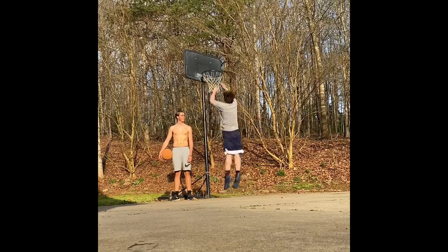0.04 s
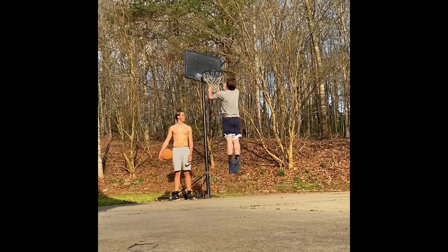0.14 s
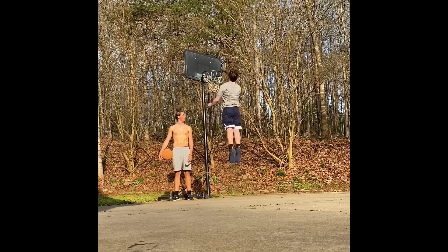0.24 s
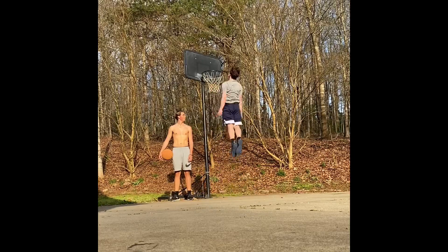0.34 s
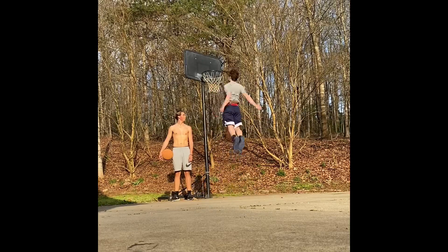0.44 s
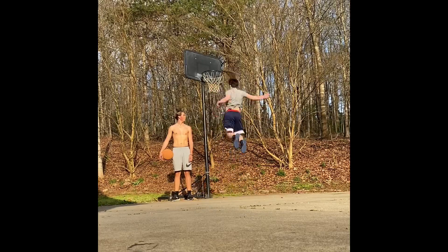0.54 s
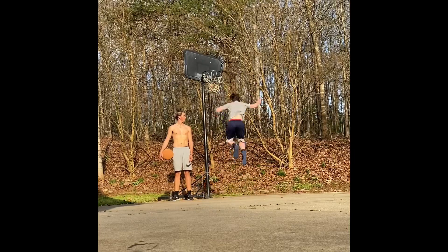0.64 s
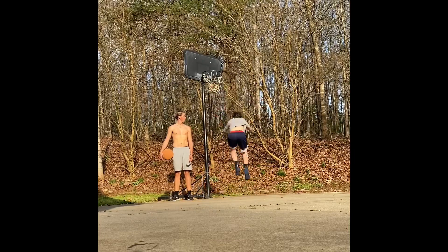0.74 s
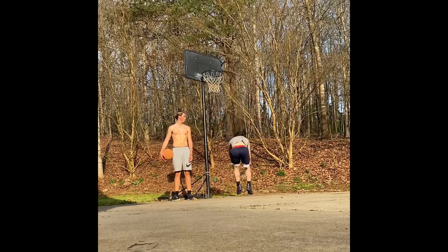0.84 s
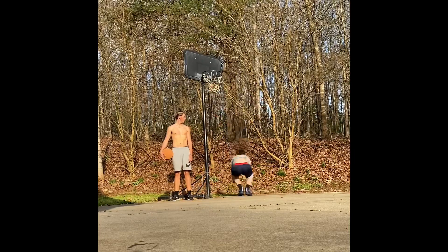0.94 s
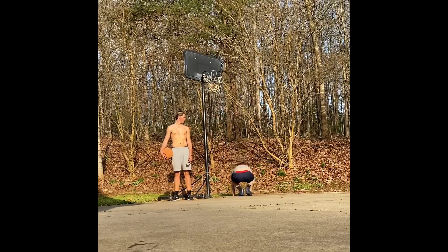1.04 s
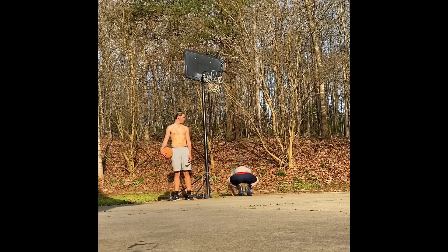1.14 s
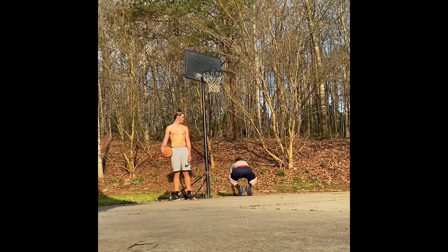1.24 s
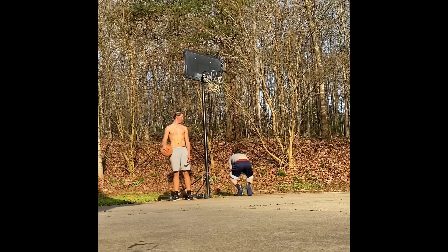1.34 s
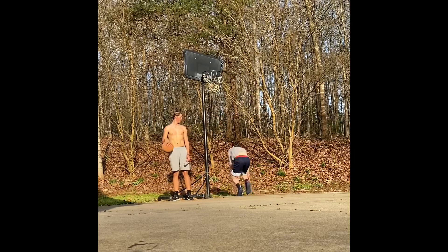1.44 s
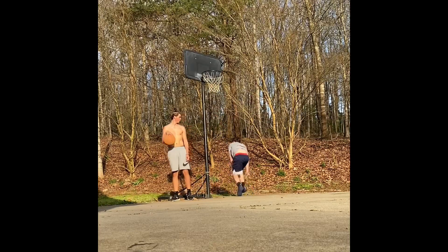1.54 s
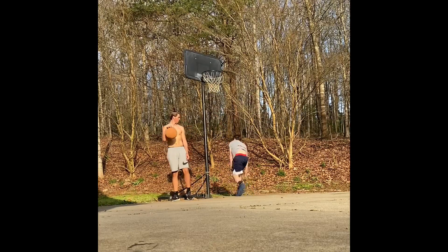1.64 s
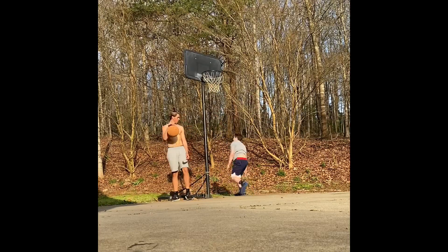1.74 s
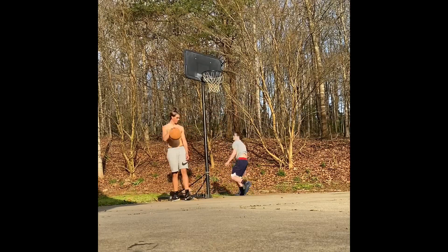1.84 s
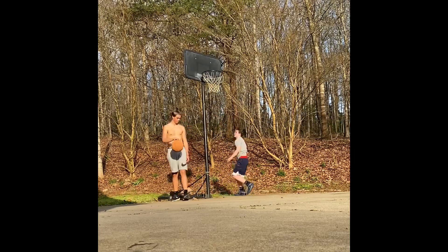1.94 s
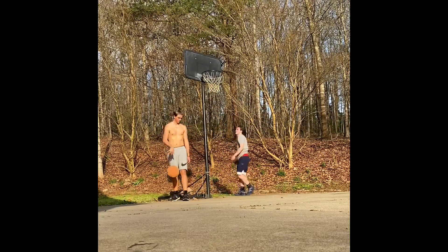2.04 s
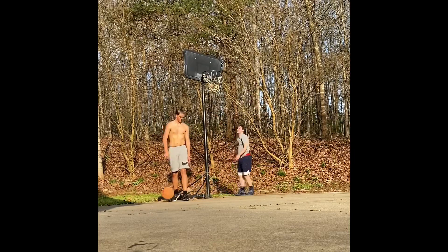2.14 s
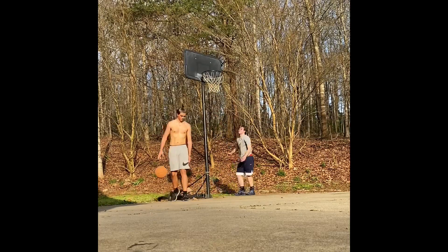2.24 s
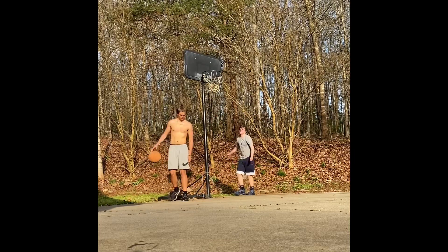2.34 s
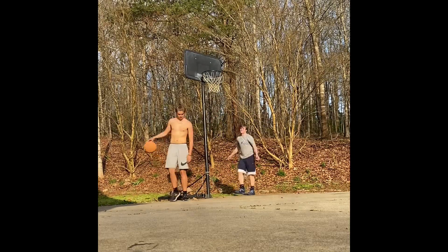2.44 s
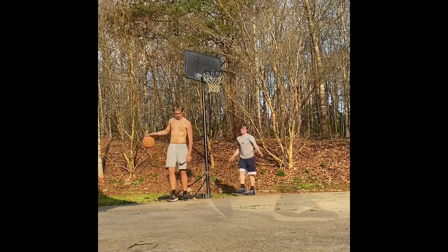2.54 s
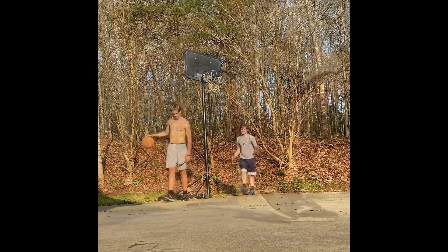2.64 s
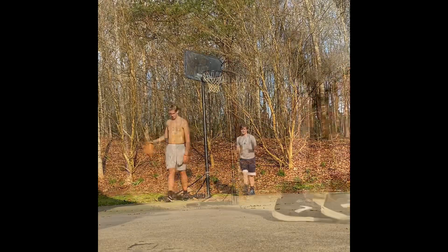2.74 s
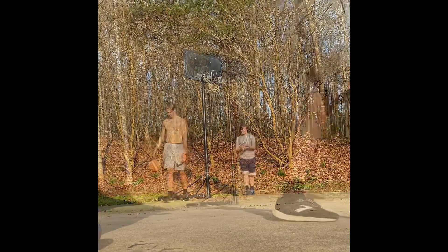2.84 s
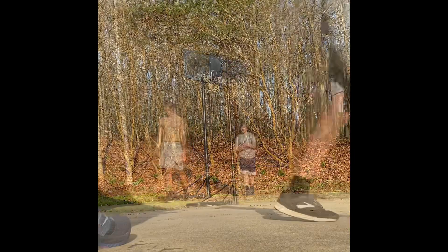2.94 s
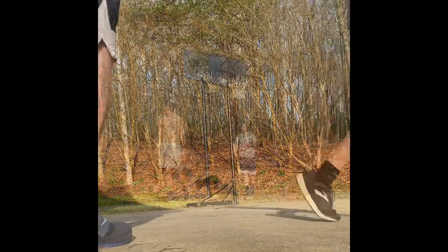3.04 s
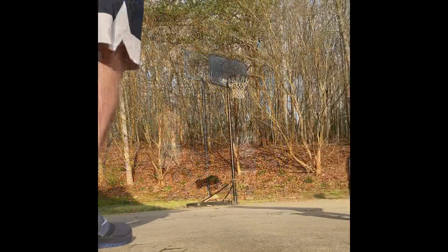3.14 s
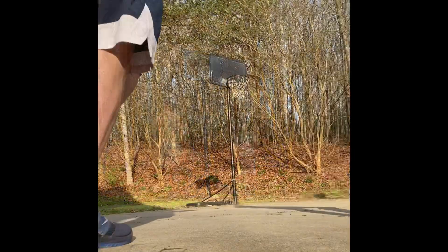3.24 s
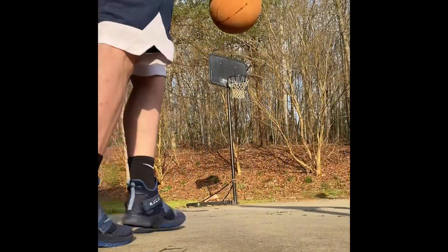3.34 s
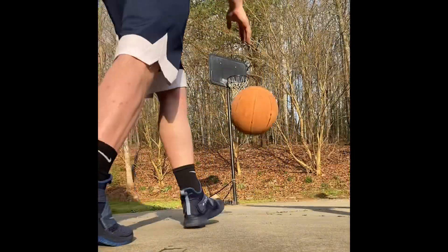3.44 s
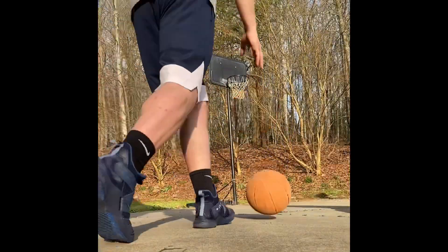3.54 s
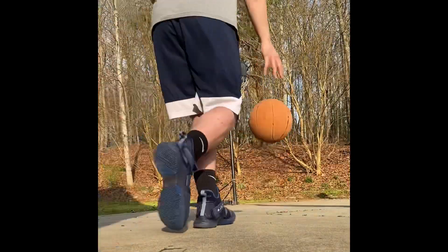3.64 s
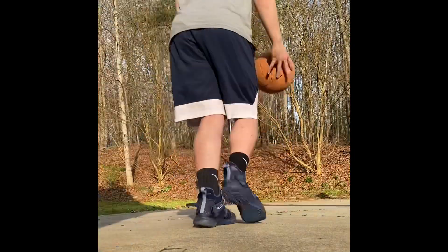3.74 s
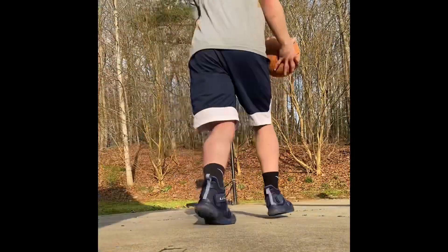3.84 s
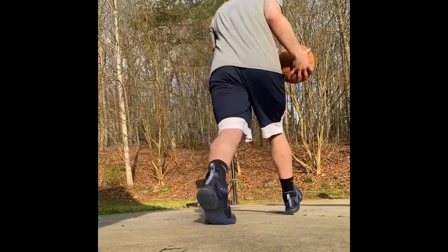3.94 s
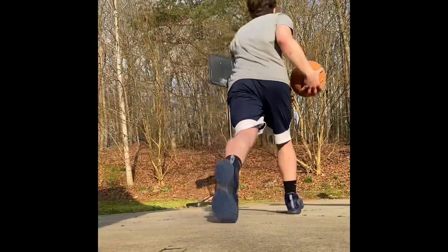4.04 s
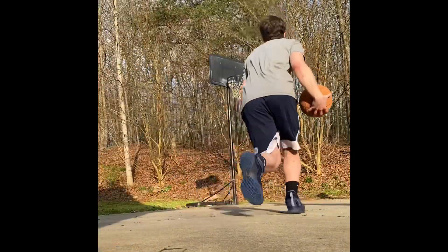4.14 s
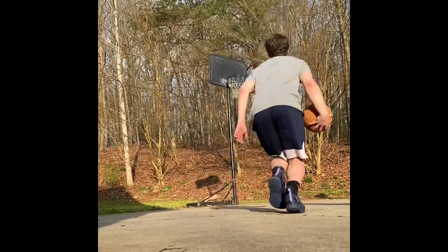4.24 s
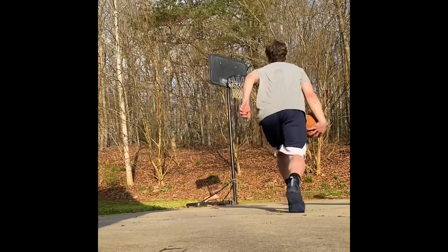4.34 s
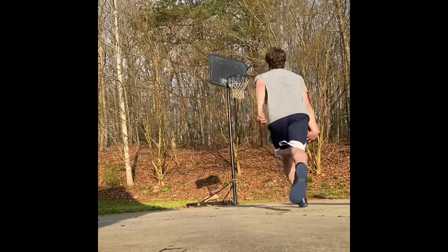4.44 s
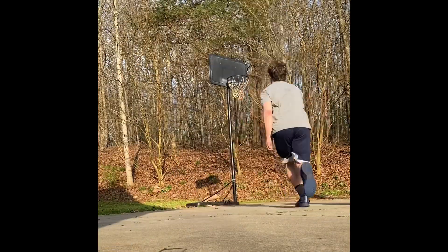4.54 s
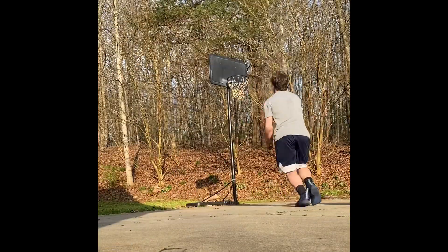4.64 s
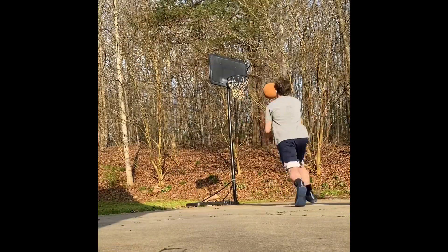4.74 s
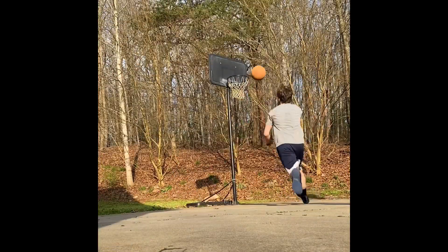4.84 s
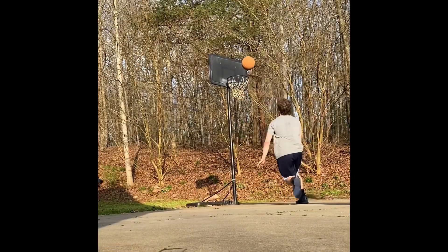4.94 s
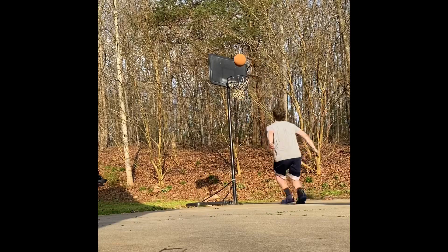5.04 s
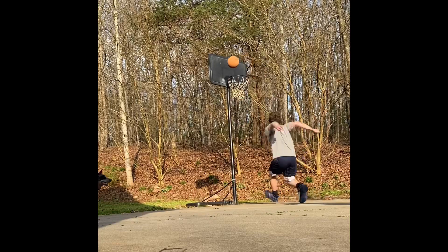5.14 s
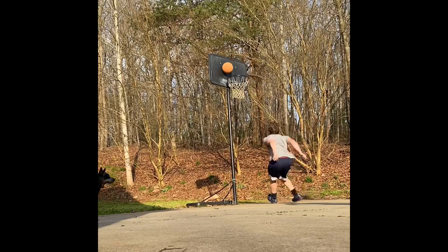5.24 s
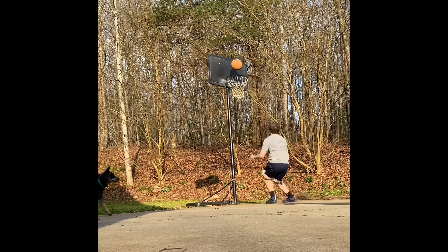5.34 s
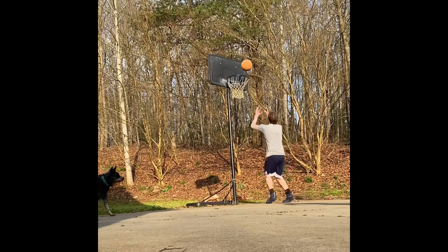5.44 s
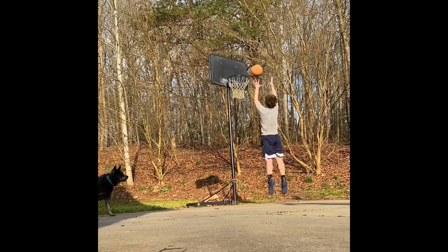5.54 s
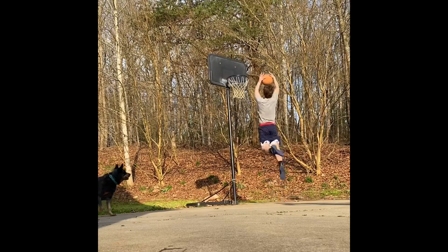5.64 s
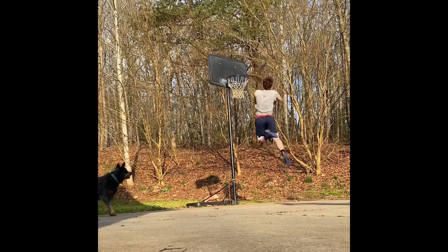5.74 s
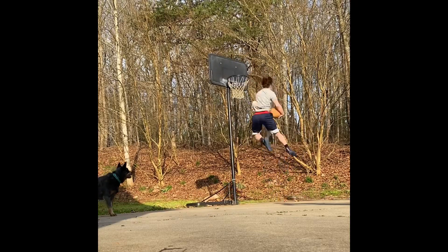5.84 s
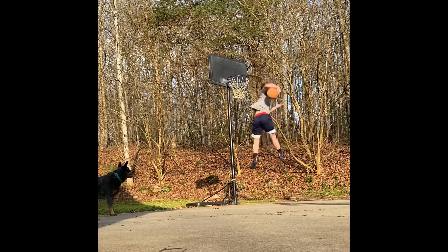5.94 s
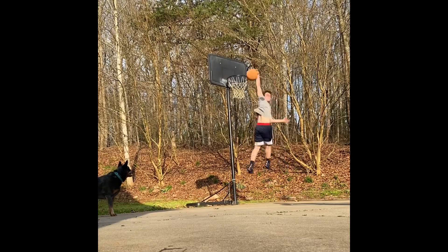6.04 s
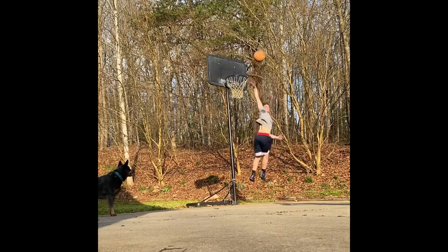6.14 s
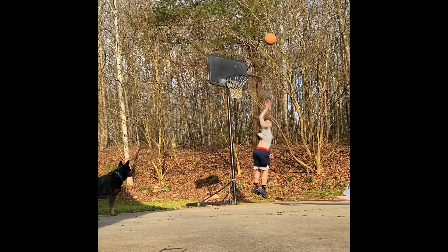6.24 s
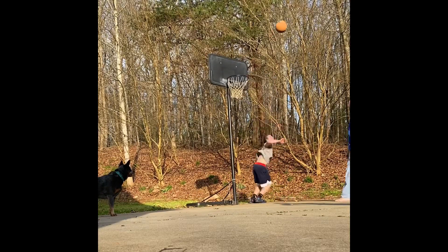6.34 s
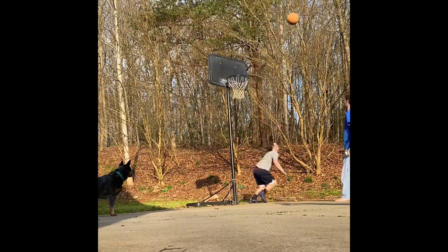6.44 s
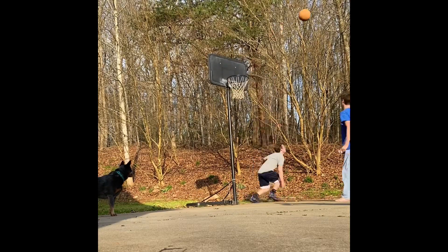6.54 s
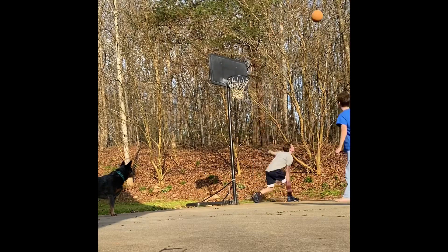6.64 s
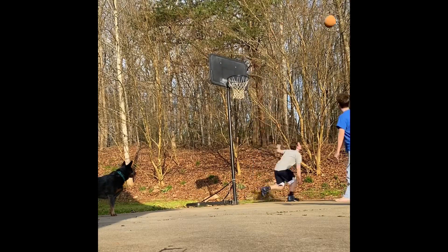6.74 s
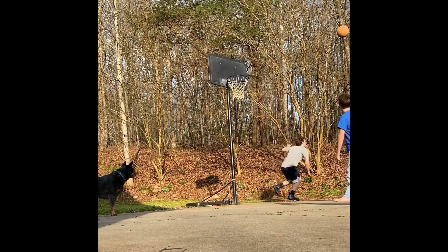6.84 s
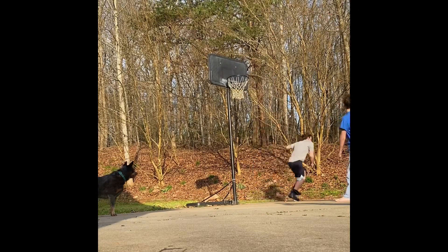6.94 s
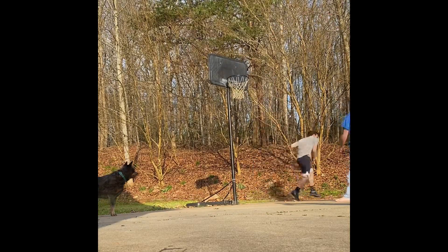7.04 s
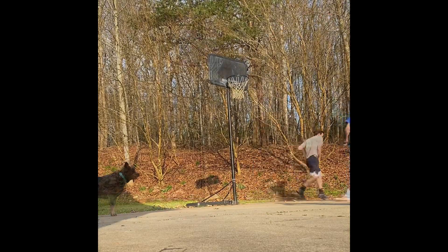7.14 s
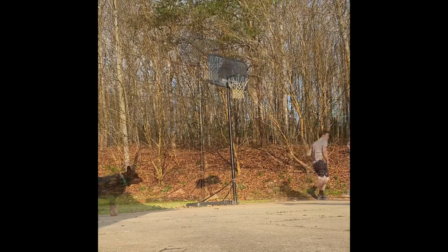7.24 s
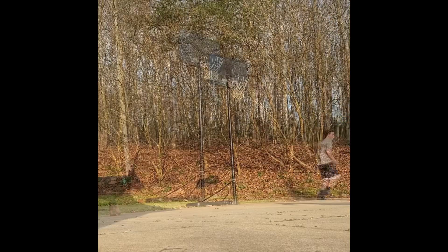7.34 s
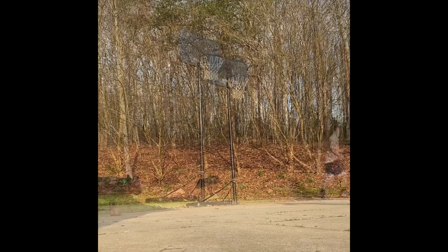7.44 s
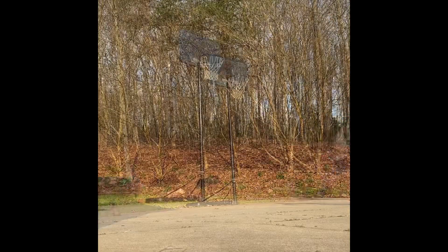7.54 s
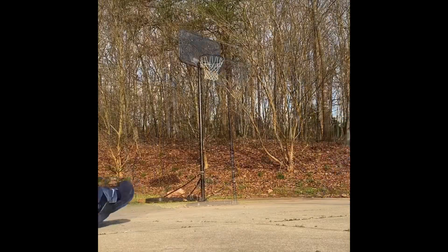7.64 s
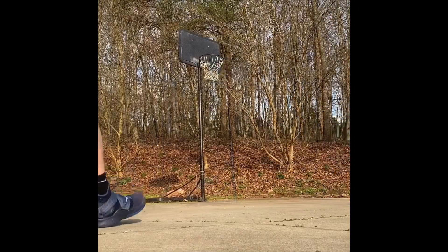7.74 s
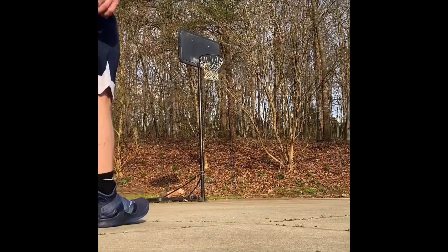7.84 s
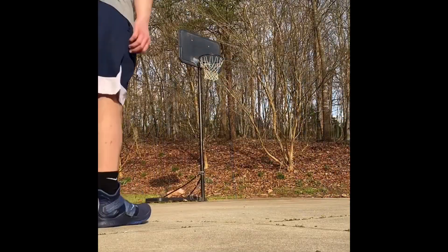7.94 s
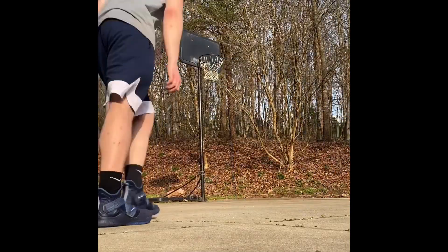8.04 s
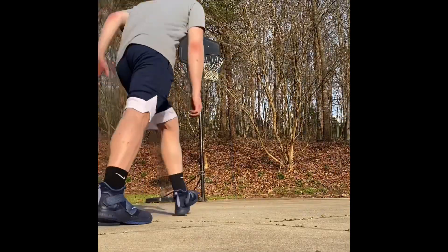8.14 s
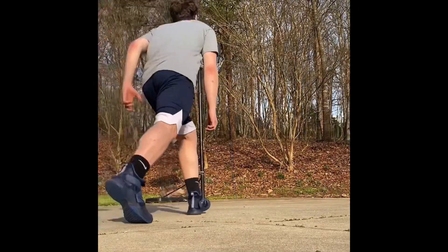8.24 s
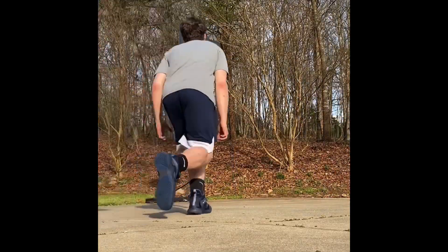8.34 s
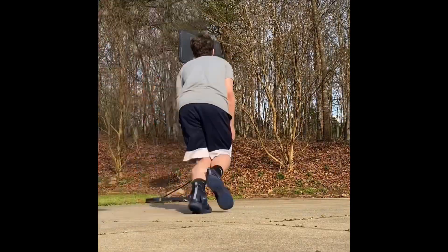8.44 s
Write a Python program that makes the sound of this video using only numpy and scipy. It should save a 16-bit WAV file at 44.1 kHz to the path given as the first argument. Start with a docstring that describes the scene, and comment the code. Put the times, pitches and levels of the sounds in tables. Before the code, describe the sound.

Scattered basketball bounces and gritty footsteps on outdoor asphalt, then a loose hoop clatters and clinks, with a far motor humming underneath.

```python
"""A ball bounces on a driveway at the edge of a wood: each impact gives a falling slap and a low
thump, and excites the modes of the ball's shell and enclosed air. Shoes land, scuff and squeak on
gritty asphalt, and a portable hoop rattles and clinks in its own modes. A far motor hums, a distant
bird whistles, traffic rumbles and leaves rustle. Trees and walls scatter echoes, and two closely
spaced microphone ports receive the sound with a phase difference."""
import sys
import numpy as np
from scipy import signal
from scipy.fft import rfft, irfft, next_fast_len
from scipy.io import wavfile

SR = 44100
rng = np.random.default_rng(int(sys.argv[2]) if len(sys.argv) > 2 else 0)


def file_out(sig):
    """Save sig as 16-bit WAV at sys.argv[1]."""
    # one column per channel
    cols = np.atleast_2d(sig).T
    # limit, then scale
    lim = np.clip(cols, -1, 1)
    pcm = np.round(lim * 32767).astype(np.int16)
    wavfile.write(sys.argv[1], SR, pcm)


N = 373959


def amp(db):
    """Amplitude ratio of a level in decibels."""
    return 10 ** (np.asarray(db) / 20)


def unit_rms(x):
    """Normalisation to unit rms."""
    return x / np.sqrt(np.mean(x ** 2) + 1e-20)


def in_time(rows):
    """Linear interpolation of each column at every sample."""
    times, *columns = np.transpose(rows)
    return [np.interp(np.arange(N) / SR, times, column) for column in columns]


def at_hz(points, hz):
    """Interpolation on a logarithmic frequency axis."""
    freqs, values = np.transpose(points)
    return np.interp(np.log(hz + 1), np.log(freqs + 1), values)


def coloured(x, points):
    """Zero-phase filtering by a gain curve."""
    size = next_fast_len(N + 4096)
    gain = amp(at_hz(points, np.fft.rfftfreq(size, 1 / SR)))
    return irfft(rfft(x, size) * gain, size)[..., :N]


def band(x, low_hz, high_hz):
    """Band-pass filter with gentle slopes."""
    sos = signal.butter(2, [low_hz, min(high_hz, .45 * SR)], "band", fs=SR, output="sos")
    return signal.sosfilt(sos, x)


def drift(knots_per_s):
    """Random modulation: straight lines between standard normal values."""
    knots = rng.standard_normal(800)
    return np.interp(np.arange(N) / SR * knots_per_s, np.arange(len(knots)), knots)


def mode(force, hz, t60):
    """Damped resonator whose impulse response is a decaying unit sine."""
    r, w = amp(-60 / (t60 * SR)), 2 * np.pi * hz / SR
    return signal.lfilter([0, np.sin(w)], [1, -2 * r * np.cos(w), r * r], force + 1e-18)


def decay(t, t60):
    """Exponential decay, 60 dB in t60."""
    return 10 ** (-3 * t / t60)


def add(out, s, x, pan_db=0):
    """Superposition at time s, with the left channel pan_db above the right."""
    i = round(s * SR)
    x = x[:N - i]
    out[:, i:i + len(x)] += x * amp([[pan_db / 2], [-pan_db / 2]])


def lingering(x, t60=0.93):
    """Reverberant energy: a leaky integral of the sound's power."""
    r = amp(-120 / (t60 * SR))
    return signal.lfilter([1 - r], [1, -r], np.mean(x ** 2, axis=0))


# background: t/s, rumble level/dB, leaf murmur level/dB, rustle level/dB
AIR_LEVELS = [(0.0, -46, -60, -58.5), (1.9, -46, -57, -88.5), (3.3, -48, -62.5, -78),
              (4.6, -46.5, -56, -69.5), (7.2, -49.5, -59.5, -81.5), (7.8, -49, -63.5, -90),
              (8.48, -48, -60, -92)]
# its spectra, in phase and in antiphase at the ports: f/Hz, level/dB
AIR_IN_PHASE = [(18, -46), (30, 3), (118, -1), (176, -5.5), (359, -14), (3570, -28.5), (5890, -33.5),
                (7280, -44), (8760, -73.5), (11400, -66.5), (14100, -47), (16500, -90)]
AIR_ANTIPHASE = [(18, -47), (30, -29.5), (112, -6.5), (261, -12.5), (772, -6.5), (1120, -10.5),
                 (1840, -19.5), (2970, -15.5), (6550, -27.5), (10500, -27.5), (14100, -38.5), (16500, -79)]
BALL_WASH_DB, HOOP_WASH_DB = (-14.5, -22.5, -46), (-14, -14.5, -38.5)   # rumble, murmur, rustle


def open_air(ball, hoop):
    """Incoherent sources add in power: traffic, leaves and the far scatter of ball and hoop."""
    white = rng.standard_normal((2, N))
    pair = np.array([coloured(white[0], AIR_IN_PHASE), amp(-10) * coloured(white[1], AIR_ANTIPHASE)])
    rumble, below_rustle = (signal.sosfiltfilt(signal.butter(1, hz, fs=SR, output="sos"), pair)
                            for hz in (330, 2700))
    layers = rumble, below_rustle - rumble, pair - below_rustle
    late_ball, late_hoop = lingering(ball), lingering(hoop)
    total = 0
    for layer, db, ball_db, hoop_db in zip(layers, in_time(AIR_LEVELS), BALL_WASH_DB, HOOP_WASH_DB):
        power = amp(db) ** 2 + amp(ball_db) ** 2 * late_ball + amp(hoop_db) ** 2 * late_hoop
        total = total + layer / np.std(layer[0]) * np.sqrt(power) * amp(1.3 * drift(12))
    mid, side = total
    return np.array([mid + side, mid - side])


# far motor: t/s, level/dB
MOTOR_LEVELS = [(0.0, -34), (0.6, -36), (1.0, -40.5), (1.7, -41.5), (2.05, -51.5), (2.35, -35.5),
                (2.85, -47), (3.45, -41.5), (3.95, -36), (4.7, -45), (5.1, -47), (6.3, -43.5), (6.8, -36.5),
                (7.25, -47), (8.48, -71)]
# its partials: harmonic number, relative level/dB
MOTOR_HARMONICS = [(1, -4), (2, -27.5)]


def motor_hum(hz=110.6, sag_hz_per_s=.28):
    """A periodic source gives harmonics; they sink slowly and waver as they carry through the air."""
    phase = 2 * np.pi * np.cumsum(hz - sag_hz_per_s * np.arange(N) / SR + 0.5 * drift(12)) / SR
    tones = sum(amp(db + 1.7 * drift(8.3)) * np.sin(k * phase) for k, db in MOTOR_HARMONICS)
    return np.sqrt(2) * amp(in_time(MOTOR_LEVELS)[0]) * tones * amp([[-.2], [.2]])


# position of the feet: t/s, left-minus-right level/dB
FOOT_PATH = [(0, -4.5), (2.9, 2), (4.2, -4.5), (5.2, 3.5), (6.5, 2), (8.48, 6)]


def foot_pan(s):
    """A level difference between the channels places the feet at time s."""
    return np.interp(s, *np.transpose(FOOT_PATH))


# single grains underfoot: t/s, level/dB, centre f/Hz
GRIT_CRACKS = [(0.075, -26, 4900), (0.1194, -47.5, 4470), (0.7803, -37.5, 5400), (1.055, -31, 5470),
               (2.7134, -45.5, 3600), (2.863, -40, 2120), (2.9362, -41, 2160), (3.478, -51, 3540),
               (3.955, -30, 2500), (4.2308, -31.5, 2480), (4.2459, -23, 3000), (4.2905, -36, 2840),
               (4.312, -27.5, 3470), (4.447, -38, 2240), (4.778, -26, 3470), (4.791, -30, 3330),
               (7.875, -50, 5470), (7.907, -52, 5200), (7.965, -46, 3340), (8.315, -46, 5600),
               (8.34, -44, 2000), (8.351, -41, 5500), (8.3887, -43.5, 3430)]


def grit_cracks(t60=0.001):
    """Brittle fracture: a grain cracks in a very short pulse, so its spectrum is broad."""
    out, t = np.zeros((2, N)), np.arange(SR // 50) / SR
    for s, db, hz in GRIT_CRACKS:
        crack = band(rng.standard_normal(len(t)) * decay(t, t60), hz / 1.4, hz * 1.4)
        add(out, s, amp(db) * crack / np.abs(crack).max(), foot_pan(s))
    return out


# light footsteps and dull knocks from the hoop's backboard: t/s, level/dB, centre f/Hz, t60/s
TAPS = [(0.16, -35.5, 444, 0.022), (0.412, -36.5, 700, 0.032), (1.053, -30, 902, 0.054),
        (1.071, -22, 1140, 0.023), (1.668, -34, 550, 0.043), (2.399, -25.5, 724, 0.024),
        (2.403, -45, 5600, 0.19), (2.953, -17.5, 650, 0.0057), (3.27, -37, 2060, 0.014),
        (3.742, -36, 695, 0.054), (3.8, -30.5, 480, 0.056), (3.823, -38, 400, 0.05),
        (4.454, -30.5, 970, 0.04), (4.629, -29, 1750, 0.033), (4.765, -24, 2870, 0.044),
        (5.027, -31.5, 516, 0.1), (5.116, -20, 2100, 0.0079), (6.104, -17.5, 430, 0.098),
        (6.294, -30, 1500, 0.015), (6.306, -28, 1700, 0.019), (6.316, -36, 350, 0.03),
        (6.363, -33, 3470, 0.03), (6.67, -28.5, 5950, 0.024), (6.817, -40, 560, 0.093),
        (7.054, -30, 2120, 0.0093), (7.164, -36.5, 644, 0.034), (7.577, -44, 471, 0.024),
        (7.908, -35, 600, 0.0082), (8.009, -45, 1890, 0.018), (8.071, -46, 3930, 0.07)]


def taps():
    """A heavily damped impact gives a decaying band of noise under a brief broadband tick."""
    out, t = np.zeros((2, N)), np.arange(SR // 8) / SR
    for s, db, hz, t60 in TAPS:
        noise = rng.standard_normal(len(t))
        puff = unit_rms(band(noise, hz / 1.63, hz * 1.38))
        tick = 2.5 * noise * decay(t, 0.0026)
        envelope = decay(t, t60) * np.minimum(t / 0.0029, 1)
        add(out, s, amp(db) * (puff + tick) * envelope, foot_pan(s))
    return out


# bounces and hard landings: t/s, level/dB, thump gain/dB, crack gain/dB, thump f/Hz,
# echo gain/dB re crack, thump delay/s, hollow gain/dB, slap sweep span/Hz
IMPACTS = [(0.883, -15, -4.5, -27, 84, 6.5, 0.0067, -0.5, 1993),
           (0.9028, -12, -2.5, -20, 85.5, 3.5, 0.0054, -12, 2240),
           (2.151, -12, 4.5, -8.5, 93, -4.5, 0.0073, -1, 2250),
           (2.997, -24.5, 3.5, -22, 102, -26, 0.0052, 0, 2585),
           (3.533, -6.5, 1.5, -10, 108, -25.5, 0.00917, 1, 3037),
           (5.269, -18.5, 5.5, 3, 87.5, -23, 0.0083, 1.5, 2560),
           (7.462, -19, 1.5, -4.5, 103.4, -21, 0.0059, 1, 2580)]
# modes of the ball's air and shell: f/Hz, level/dB, t60/s
BALL_MODES = [(231, -7.5, 0.04), (352, -12.5, 0.024), (683, -21, 0.056), (856, -12, 0.099),
              (1117, -3, 0.026), (1336, -8, 0.034), (1680, -12.5, 0.053), (2090, -16.5, 0.03)]


def bounces(spread_s=0.002164, thump_fall=0.21):
    """Elastic impact: as the contact patch spreads, a slap falls into a thump; the cavity rings on."""
    out, t = np.zeros((2, N)), np.arange(SR // 4) / SR
    echo_envelope = np.clip((t - .009) / 0.0039, 0, 1) * decay(t, 0.16)   # off nearby surfaces
    for s, db, thump_db, crack_db, thump_hz, echo_db, delay, hollow_db, span_hz in IMPACTS:
        noise = rng.standard_normal(len(t))
        sweep = 2 * np.pi * (200 * t + span_hz * spread_s * (1 - np.exp(-t / spread_s)))
        slap = np.sin(sweep) * (1 + 1.34 * band(noise, 140, 1950))
        slap *= np.exp(-(t / (3.65 * spread_s)) ** 2) * np.minimum(t / 0.00019, 1)
        early, late = np.minimum(t - delay, 0), np.maximum(t - delay, 0)   # about the widest contact
        bend = thump_fall * 0.0039 * (1 - np.exp(-late / 0.0031))   # the thump starts sharp
        phase = 2 * np.pi * thump_hz * (2 * early + late + bend)
        thump = np.sin(phase) - 0.19 * np.sin(3 * phase)
        thump *= np.exp(-(late / 0.01) ** 2 - (early / 0.0025) ** 2)
        thump += 0.2 * np.sin(2 * np.pi * 0.89 * thump_hz * late) * decay(late, 0.46)
        crack = unit_rms(band(noise, 4300, 8900)) * decay(t, 0.0062)
        crack += amp(echo_db) * echo_envelope * unit_rms(band(noise, 1400, 4500))
        force = 0.092 * noise * decay(t, 0.056)
        hollow = sum(amp(mode_db) * mode(force, hz, t60) for hz, mode_db, t60 in BALL_MODES)
        add(out, s, amp(db) * (0.9 * slap + amp(crack_db) * crack + amp(hollow_db) * hollow), -1.4)
        add(out, s, amp(db + thump_db) * thump)
    return out


# soles sliding on grit: t/s, duration/s, start level/dB, end level/dB, starting centre f/Hz
SLIDES = [(2.397, 0.038, -39.5, -48, 1030), (2.861, 0.11, -60.5, -51.5, 1420), (3, 0.068, -40, -43.5, 1175),
          (3.455, 0.065, -49.5, -43, 1390), (3.955, 0.078, -41, -39, 1830), (4.25, 0.14, -52.5, -43, 2890),
          (4.466, 0.0075, -37.5, -41, 1120), (4.548, 0.016, -46, -47.5, 2400),
          (4.689, 0.048, -55.5, -48, 2050), (4.765, 0.043, -40, -43, 2650),
          (4.881, 0.028, -42.5, -77, 2400), (5.034, 0.015, -33, -68, 1090),
          (5.184, 0.019, -35, -37.5, 2830), (5.218, 0.032, -29, -41, 5500),
          (7.133, 0.061, -57.5, -63.5, 4480), (7.911, 0.052, -57.5, -52.5, 2080),
          (8.054, 0.02, -54.5, -54, 4130), (8.085, 0.049, -49, -54, 1500),
          (8.301, 0.11, -61.5, -50.5, 1830), (8.406, 0.056, -45.5, -55.5, 1310)]


def scuffs(ramp_s=0.018, sag_oct_per_s=7):
    """Sliding friction: grains snap over a hiss whose broad spectral peak sinks as the sole slows."""
    snaps = rng.random(N) < 300 * amp(6.0 * drift(40)) / SR
    snaps = snaps * amp(4.5 * np.minimum(rng.exponential(1, N), 2.5))
    grit = rng.standard_normal(N) * (1 + 7.0 * snaps) * amp(2.6 * drift(90))
    course, gate, out = [], 0, 0
    for s, length, start_db, end_db, hz in SLIDES:
        end = s + length
        course += [(s, start_db, hz), (end, end_db, hz * 2 ** (-sag_oct_per_s * length))]
        gate = gate + np.interp(np.arange(N) / SR, [s - ramp_s, s, end, end + ramp_s], [0, 1, 1, 0])
    level_db, centre_hz = in_time(course)
    edges = np.geomspace(300, 16000, 10)
    for k, (low, high) in enumerate(zip(edges, edges[1:])):
        octaves = np.log2(np.sqrt(low * high) / centre_hz)
        hump = 0.38 + np.exp(-.5 * (octaves / 0.99) ** 2)
        sign = (-1) ** k   # neighbouring bands join without a dip
        out = out + sign * unit_rms(band(grit, low, high)) * hump * amp(2.8 * drift(60))
    return 0.3 * out * amp(level_db) * np.minimum(gate, 1) * amp([[-1.1], [1.1]])


# whistles: t/s, glide duration/s, start f/Hz, glide end f/Hz, final drop/Hz, level/dB
WHISTLES = [(2.45, 0.16, 2850, 2850, 0, -67), (7.212, 0.1, 4110, 4110, 0, -71),
            (7.57, 0.04, 3450, 3450, 0, -70), (7.645, .093, 4050, 3300, 1000, -70),
            (7.94, 0.075, 3620, 3200, 850, -70), (8.21, 0.09, 3740, 3170, 750, -71)]


def bird(swell_db=4, drop_s=.022, drop_db=5):
    """Frequency modulation of a pure tone: it holds, or glides down into a quick, louder drop."""
    out, t = np.zeros((2, N)), np.arange(SR // 4) / SR
    waver_hz, waver_db = 13.0 * drift(45), 2.3 * drift(60)
    for s, glide, start_hz, knee_hz, drop_hz, db in WHISTLES:
        drops = drop_hz > 0
        end = glide + drop_s * drops
        here = slice(round(s * SR), round(s * SR) + len(t))
        hz = np.interp(t, [0, glide, glide + drop_s], [start_hz, knee_hz, knee_hz - drop_hz])
        level_db = np.interp(t, [0, glide, glide + drop_s / 4], [db - swell_db, db, db + drop_db * drops])
        gate = np.clip(np.minimum(t, end + .008 - t) / .008, 0, 1)
        tone = np.sqrt(2) * np.sin(2 * np.pi * np.cumsum(hz + waver_hz[here]) / SR)
        add(out, s, amp(level_db + waver_db[here]) * gate * tone)
    return out


# shoe squeaks and two sharp knocks: peak t/s, level/dB, f/Hz, 1/e half-width/s, fall rate/(Hz/s)
CHIRPS = [(5.12, -38, 2140, 0.0053, 20000), (5.223, -33.5, 4420, 0.0059, 5000),
          (6.336, -31, 2120, 0.0029, 150000), (6.365, -26.5, 2010, 0.0035, 121000),
          (6.677, -23.5, 2080, 0.0041, 70000), (8.144, -66.5, 4200, 0.012, 1000)]


def falling_chirps(roughness=0.43):
    """Linear chirp in a Gaussian envelope: a short rough tone swells, falls in pitch and is gone."""
    out, t = np.zeros((2, N)), np.arange(SR // 16) / SR - .03
    for s, db, hz, half_width, fall in CHIRPS:
        flutter = unit_rms(band(rng.standard_normal(len(t)), 60, 830))
        tone = np.sin(2 * np.pi * (hz * t - fall * t ** 2 / 2)) * (1 + roughness * flutter)
        add(out, s + t[0], amp(db) * tone * np.exp(-(t / half_width) ** 2), foot_pan(s))
    return out


# jolts through the hoop: t/s, level/dB, metal gain/dB, shaking t60/s
HOOP_JOLTS = [(5.284, -21, -9.5, 0.36), (5.471, -21.5, -12, 0.14), (5.489, -25, -22, 0.19),
              (5.652, -32.5, -16.5, 0.15), (5.679, -25, -14.5, 0.11), (5.82, -30, -2.5, 0.084),
              (5.845, -36, -9.5, 0.21), (6.05, -40.5, -5.5, 0.34), (6.074, -26, -14.5, 0.23),
              (6.089, -23.5, -14.5, 0.34), (6.1, -17.5, -9, 0.19), (6.123, -15.5, -32, 0.065),
              (6.218, -32, -34, 0.38), (6.275, -26.5, -26, 0.069), (6.296, -22.5, -38, 0.086),
              (6.316, -20.5, -33, 0.049), (6.335, -24, -18.5, 0.13), (6.446, -29, -30, 0.27),
              (6.488, -32.5, -11.5, 0.19), (6.582, -35.5, -10, 0.4), (6.679, -27.5, -14, 0.11),
              (6.812, -34, -18, 0.32), (6.828, -31, -23, 0.13)]
# modes of backboard and base, then of rim and pole: f/Hz, level/dB, t60/s
BOARD_MODES = [(56, -0.5, 0.09), (131.6, -7, 0.06), (171.6, -6.5, 0.2), (276.6, -1, 0.14), (352, -1, 0.12),
               (410, 3, 0.073), (463, 0.5, 0.084), (544, 4.5, 0.066), (680, 1, 0.038), (793, 1, 0.046),
               (1065, 2, 0.011), (1655, -5, 0.037)]
METAL_MODES = [(2620, -4, 0.011), (3440, -20.5, 0.023), (3450, -3.5, 0.034), (3830, 0, 0.014),
               (4600, -9.5, 0.029), (4300, -4, 0.0073), (5585, -5.5, 0.058)]


def hoop_rattle(knocks_per_s=300, knock_size=5.5):
    """Forced vibration: uneven knocks in the loose frame drive its modes, differently at each jolt."""
    out, t = np.zeros((2, N)), np.arange(SR // 3) / SR
    shape = len(HOOP_JOLTS), 2, len(t)   # one force on the board, one on the metal
    rattle = rng.standard_normal(shape) * amp(3.0 * np.minimum(rng.exponential(1, shape), 3))
    forces = 0.72 * rattle * (1 + knock_size * (rng.random(shape) < knocks_per_s / SR))
    forces[..., SR // 400] = 15   # a strong opening knock
    strikes = 2.92 * rng.standard_normal((len(HOOP_JOLTS), 2, 20))   # vary each mode's level and pitch
    for jolt, (on_board, on_metal), (board_strike, metal_strike) in zip(HOOP_JOLTS, forces, strikes):
        s, db, metal_db, shake_t60 = jolt
        shake = decay(t, shake_t60) * np.minimum(t / 0.0031, 1)
        board = sum(amp(mode_db + shift) * mode(on_board * shake, hz * (1 + 0.011 * shift), t60)
                    for (hz, mode_db, t60), shift in zip(BOARD_MODES, board_strike))
        board += 38.0 * band(on_board * shake, 256, 1100)   # dull clatter of the loose joints
        jingle = on_metal * shake ** 1.5   # the metal stops shaking sooner
        detunings = 1 + .02 * np.sin(metal_strike[::-1])
        metal = sum(amp(mode_db + 1.8 * shift) * mode(jingle, hz * detune, t60)
                    for (hz, mode_db, t60), shift, detune in zip(METAL_MODES, metal_strike, detunings))
        metal += 20.0 * band(on_metal * shake, 1230, 9300)
        add(out, s, amp(db - 35.5) * board + amp(db + metal_db - 28.0) * metal, -.8)
    return out


# reverberation among trees and walls: f/Hz, t60/s
WOOD_DECAY = [(60, 0.63), (250, 0.78), (1000, 0.22), (4000, 0.61), (12000, 0.053)]


def wood_echoes(x, gain_db=-13):
    """Diffuse scattering: a noise tail dies band by band, alike at both ports in the bass."""
    t, edges = np.arange(SR) / SR, np.geomspace(40, 16000, 10)
    white = rng.standard_normal((2, 3, SR))   # neighbouring bands get unrelated noise
    noise = white[:, :1] + 0.86 * band(white[:, 1:], 190, 5600)   # common part plus each port's own
    tail = sum(band(noise[k % 2], low, high) * decay(t, at_hz(WOOD_DECAY, low * 1.104))
               for k, (low, high) in enumerate(zip(edges, edges[1:])))
    tail *= np.clip((t - .004) / 0.00084, 0, 1)
    tail /= np.sqrt(np.sum(tail ** 2) / 2)
    return amp(gain_db) * signal.fftconvolve(x, tail, axes=1)[:, :N]


# lead of the left port over the right: f/Hz, phase/rad
PORT_LEAD = [(150, 0), (340, .15), (780, 1.1), (1550, .4), (2070, .3), (3010, 1.6), (3620, .7), (4570, 1.0),
             (5770, 1.4), (7900, 2.95), (11500, 3.2), (13500, 4.0), (16000, 5.0)]


def ports(x):
    """Spaced receivers: their phase difference grows, unevenly, with frequency."""
    size = next_fast_len(N + 4096)
    lead = at_hz(PORT_LEAD, np.fft.rfftfreq(size, 1 / SR))
    return irfft(rfft(x, size) * np.exp(.5j * lead * [[1], [-1]]), size)[:, :N]


# microphone response: f/Hz, level/dB
MIC_RESPONSE = [(200, -1.5), (500, -3), (1000, -1), (2000, 0), (2900, 0.5), (3500, 4), (3950, 2.5),
                (4550, 6.5), (5150, 3), (5800, 5.5), (7000, 4.5), (10000, 4), (15000, 7)]


def scene():
    """Superposition: direct sound, echoes and open air are coloured by the microphone; the hum is added."""
    ball, hoop = bounces(), hoop_rattle()
    direct = ball + hoop + taps() + grit_cracks() + falling_chirps() + scuffs() + bird()
    at_ports = ports(direct + wood_echoes(direct)) + open_air(ball, hoop)
    return coloured(at_ports, MIC_RESPONSE) + motor_hum()


BASS_CUT_HZ, TOP_CUT_HZ, OVERLOAD = 45, 16700, .95


def record(dry):
    """Band limiting and soft saturation: deep bass rolls off, peaks are rounded and the top is cut."""
    dry = signal.sosfiltfilt(signal.butter(3, BASS_CUT_HZ, "high", fs=SR, output="sos"), dry)
    rounded = dry / (1 + (dry / OVERLOAD) ** 4) ** .25
    return signal.sosfilt(signal.cheby2(16, 90, TOP_CUT_HZ, fs=SR, output="sos"), rounded)


dry = scene()
out = record(dry)
file_out(out)
```